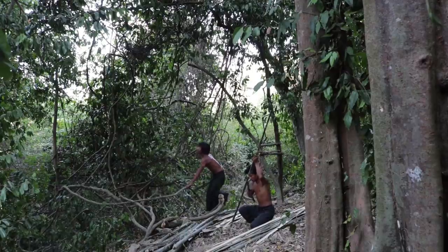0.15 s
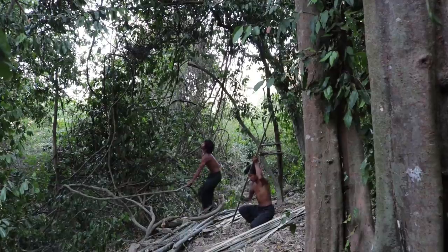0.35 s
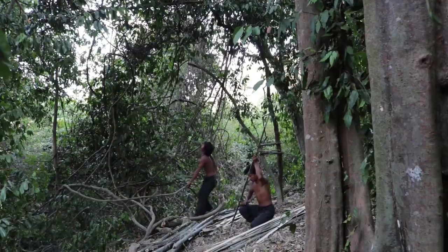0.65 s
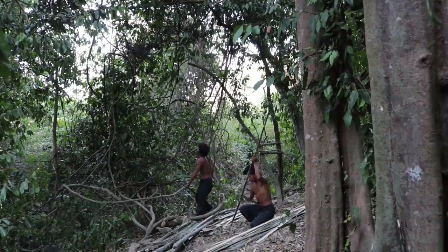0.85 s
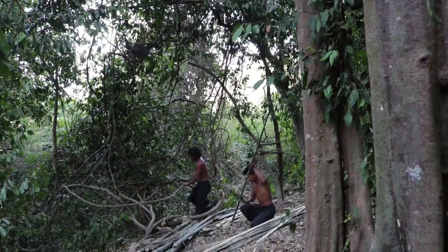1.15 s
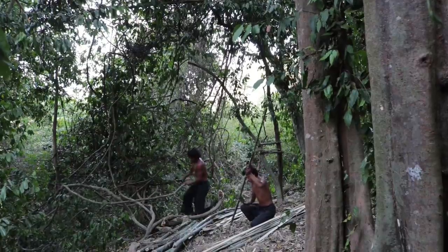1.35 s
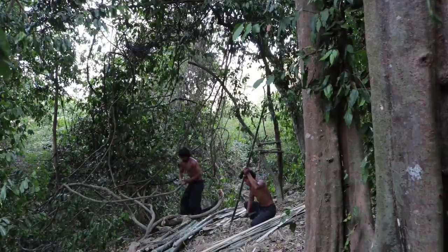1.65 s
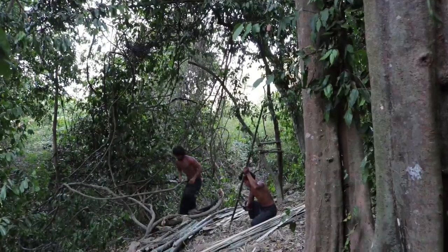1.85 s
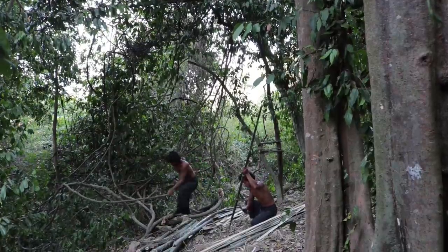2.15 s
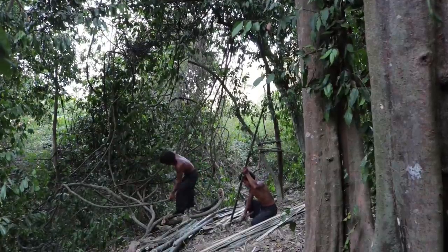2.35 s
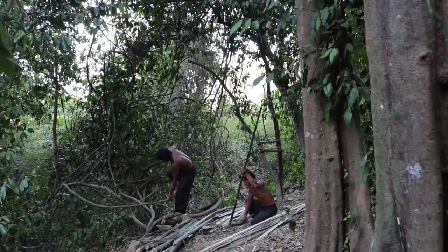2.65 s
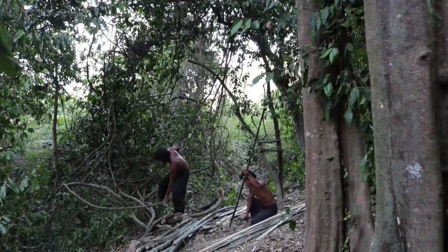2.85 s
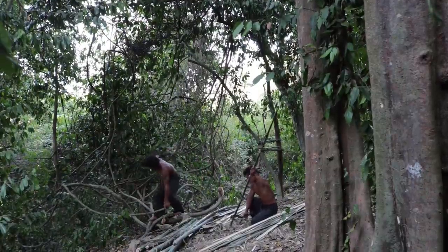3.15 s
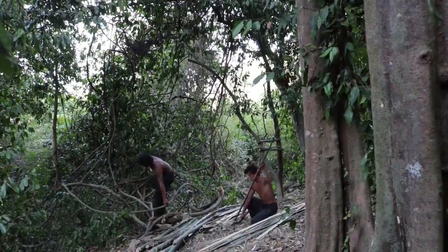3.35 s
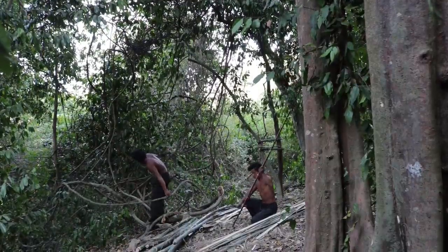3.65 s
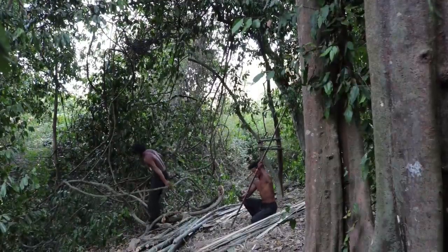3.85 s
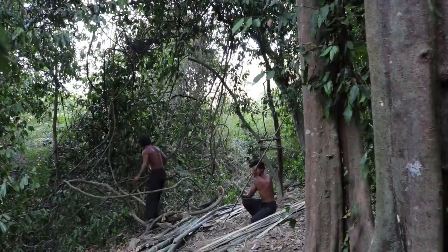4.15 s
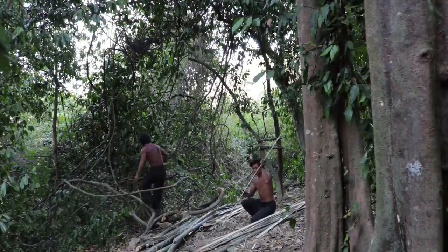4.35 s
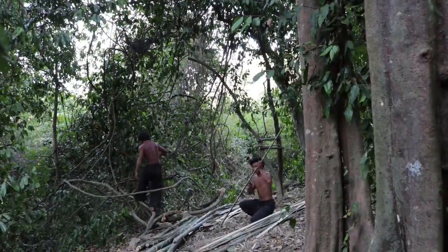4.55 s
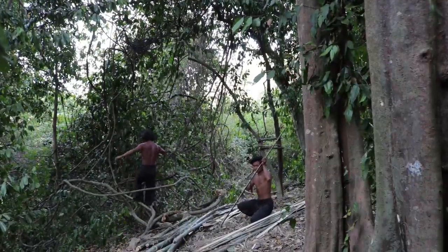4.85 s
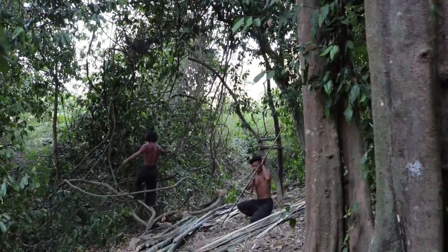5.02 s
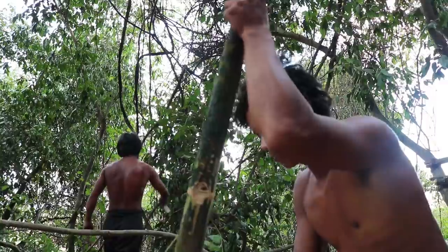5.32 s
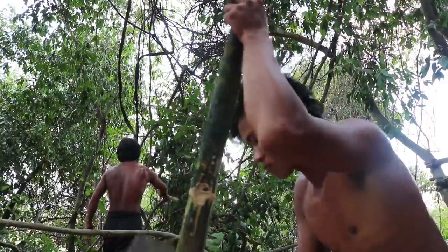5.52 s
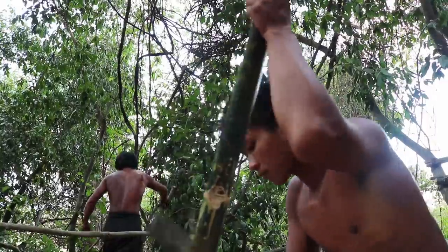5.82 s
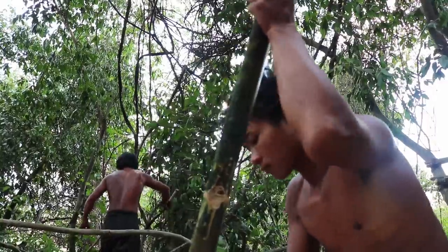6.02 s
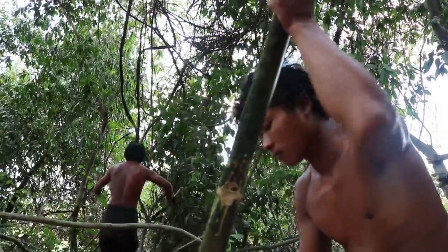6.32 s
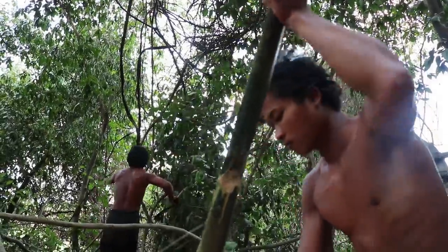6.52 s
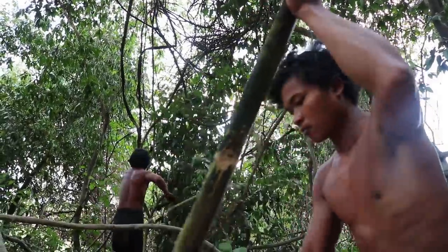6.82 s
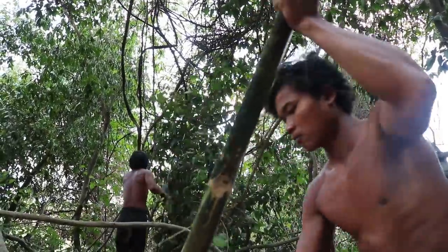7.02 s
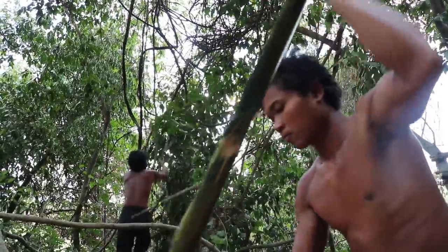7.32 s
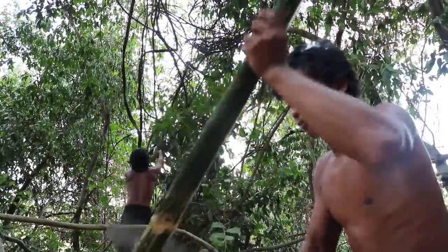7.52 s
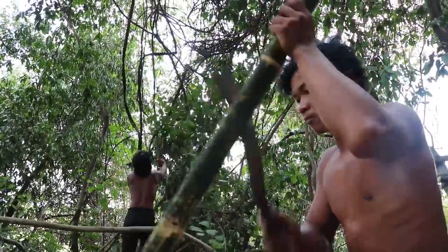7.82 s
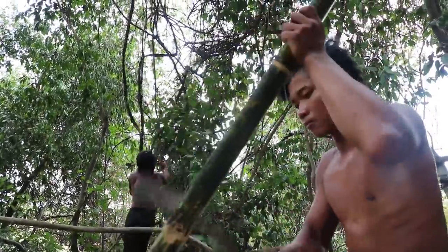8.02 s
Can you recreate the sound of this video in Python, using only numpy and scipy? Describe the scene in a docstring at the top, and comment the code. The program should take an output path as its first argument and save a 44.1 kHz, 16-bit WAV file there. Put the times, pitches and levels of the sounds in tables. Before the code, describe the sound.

In a quiet forest, distant twigs snap over rustling dry leaves and faint soft footfalls, with one sharper snap midway. The perspective suddenly jumps close: a blade cracks and rasps rapidly along a hollow bamboo pole, with bright steely bite, woody knocks and crackling brush. Strokes then thin out to faint scrapes before a last hard chop. Slightly hissy microphone, hardest hits distorted.

```python
"""Twigs snap and dry leaves rustle underfoot as green bamboo poles are trimmed far off in a forest.
Then the work is heard from close by: strokes rasp along a pole, blows chop into it.
Snaps and blows are noise bursts through resonances of wood, skin, steel and hollow pole; rasps and
rustles are patchy noise with small damped grains. One microphone feeds two slightly hissing
channels, and the hardest blows clip."""
import sys
import numpy as np
from scipy import signal
from scipy.fft import rfft, irfft, next_fast_len
from scipy.io import wavfile
from scipy.ndimage import uniform_filter1d, map_coordinates

SR = 44100
rng = np.random.default_rng(int(sys.argv[2]) if len(sys.argv) > 2 else 0)


def store_pcm(level_fs):
    """Save levels as 16-bit WAV."""
    pcm = np.round(np.clip(level_fs, -1, 1) * 32767).astype(np.int16)
    wavfile.write(sys.argv[1], SR, np.atleast_2d(pcm).T)


N = 360738
T = np.arange(N) / SR
NEAR_S = 5.35  # the listener moves close to the work

# Resonances of the hollow pole wall: (centre [Hz], width [Hz], level [dB])
POLE = [(174, 125, -4.5), (285, 67, 2.5), (514, 290, -1.5), (708, 106, 2), (920, 180, -3)]
# Resonances of the hard outer skin: (centre [Hz], width [Hz], level [dB])
SKIN = [(1120, 530, -6.5), (1850, 530, -5.5), (2590, 530, -1), (3680, 650, -3), (4930, 560, -5)]
# Resonances of the steel blade: (centre [Hz], width [Hz], level [dB])
EDGE = [(5790, 1420, -6.5), (10070, 1600, -7.5), (11000, 2100, -9.5)]


def strokes():
    """Frictional excitation: one rubbing contact drives skin, steel and hollow; fibres tear in grains."""
    # Blade and hands rubbing the pole: (full contact from [s], length [s], level at the end [dB],
    # growth along the stroke [dB], hollow relative to rasp [dB])
    stroke_rows = [(5.365, 0.07, -19, 6.5, -6), (5.588, 0.0073, -30, -8, -3.5),
                   (5.647, 0.092, -17.5, 9.5, -12.5), (5.753, 0.014, -38, -3, 5),
                   (5.8, 0.005, -33.5, 4, 4.5), (5.853, 0.061, -30, -6.5, -14), (5.95, 0.058, -18, 2.5, -5),
                   (6.076, 0.013, -41.5, -7, -15), (6.104, 0.068, -30.5, -3, -11.5),
                   (6.217, 0.066, -19.5, 3, -8.5), (6.364, 0.0062, -32.5, 1, -11),
                   (6.396, 0.15, -41, -11, -7), (6.51, 0.033, -13, 20, -12.5), (6.969, 0.02, -44, -3, -9),
                   (7.101, 0.065, -48.5, -4, -0.5), (7.201, 0.088, -54.5, -12, 0.5),
                   (7.245, 0.004, -18, -0.5, -10.5), (7.548, .13, -40.5, -10.5, -9),
                   (7.795, 0.039, -44, 5, -24), (7.952, 0.065, -16.5, 14.5, -16.5),
                   (8.105, 0.049, -47, -6, -11), (8.165, 0.031, -31, 2, -30)]
    # after lift-off both sound on faintly; the hollow drops less from its own stroke level
    shiver_db, hum_db = -22, -17
    steel_db = -9  # blade hiss beside a rasp at full scale
    brighter_when_light = 0.23  # light strokes hiss: dB of hiss gained on the rasp per dB under full scale

    rasp, hollow = np.zeros(N), np.zeros(N)
    for start, length, db, growth_db, hollow_db in stroke_rows:
        contact, trail = stroke(start, length, db, growth_db)
        rasp += contact + amp(shiver_db) * trail
        hollow += amp(hollow_db) * (contact + amp(hum_db) * trail)
    rasp, hollow = rasp * (T >= NEAR_S), hollow * (T >= NEAR_S)

    chatter = amp(2.5 * wobble(250))
    rub = unit(patchy(2) * chatter)
    fibres = grains(2890, count=9000, spread=0.44, cycles=7.2, size_db=5.5)
    skin = unit(0.74 * fibres + unit(ringing(rub, SKIN)))

    flickering_rub = rub * amp(3.0 * wobble(60))
    steel = unit(ringing(ringing(flickering_rub, EDGE), [(7960, 13000, 0)]))
    steel_level = amp(steel_db) * rasp ** (1 - brighter_when_light)

    body = unit(ringing(ringing(hollow * rub, POLE), [(370, 710, 0)]))
    body *= np.sqrt(np.mean(hollow ** 2))
    return rasp * skin + steel_level * steel + body


def stroke(start, length, db, growth_db):
    """Contact envelope: exponential build-up, even drift in dB, lift-off, then a decaying free vibration."""
    bite_db_per_s, lift_db_per_s, shiver_db_per_s = 925, 2500, 165
    after = T - start - length
    held = db + growth_db * np.clip(after / length, -1, 0)
    building = bite_db_per_s * np.maximum(start - T, 0)
    lifting = lift_db_per_s * np.maximum(after, 0)
    trail = (after > 0) * amp(db - shiver_db_per_s * np.maximum(after, 0))
    return amp(held - building - lifting), trail


def blows():
    """Impact excitation: a sharp crack rings skin and steel, a slower blunt push rings the hollow."""
    # Near blows: (time [s], peak of the crack [dB], knock relative to the crack [dB],
    # weight of the steel resonances [dB], strongest tone [Hz])
    blow_rows = [(5.352, -5, -3.5, -24, 1190), (5.417, -4, -20, -11, 3300), (5.431, -10.5, -5.5, -9, 2920),
                 (5.528, -16, 3, 2, 490), (5.569, -8.5, -6, -14, 2190), (5.731, -9.5, 1, 17, 2900),
                 (5.763, -18, 2.5, 2, 780), (5.825, -9, -6, 5, 2730), (5.994, 1.5, -20.5, 20, 4770),
                 (6.104, -13, -6.5, -12, 2670), (6.254, 0.5, -11.5, 7, 3940), (6.402, -6.5, -17, -18, 2520),
                 (6.514, 0, -10, 8.5, 460), (6.538, -7, -5, -5, 2350), (6.594, -23, -14, 6, 2280),
                 (6.799, -26, -8, 11, 1850), (7.098, -23.5, -13, 12.5, 940), (7.246, -10, -8, 1.5, 790),
                 (7.375, -26, -35, 4, 2030), (7.74, -22.5, -36, -14, 1670), (7.891, -7.5, -7, -31, 1650),
                 (7.904, -7.5, -10.5, -18, 1600), (8.012, 1, -17.5, -1.5, 5940)]
    # Soft bumps that sound the hollow: (time [s], peak level [dB])
    bump_rows = [(5.536, -23), (5.574, -18), (5.678, -14), (5.77, -27), (5.843, -27.5), (5.885, -22.5),
                 (5.964, -15.5), (6.222, -18), (7.553, -37), (8.105, -29)]

    out, t = np.zeros(N + SR), np.arange(4096) / SR
    knock = ringing(blunt_push(t, 0.0003), POLE)
    knock /= abs(knock).max()
    for s, db, knock_db, steel_db, hz in blow_rows:
        steel = [(c, w, g + steel_db) for c, w, g in EDGE]
        skin = crack(SKIN + steel, hz, t60=0.027, rise_s=0.0003, tick_db=14, tone_db=9)
        out[round(s * SR):][:len(t)] += amp(db) * (skin + amp(knock_db) * knock)

    # a soft, longer contact leaves mostly the main note of the hollow
    bump = ringing(ringing(blunt_push(t, 0.0014), POLE), POLE[1:2])
    bump /= abs(bump).max()
    for s, db in bump_rows:
        out[round(s * SR):][:len(t)] += amp(db) * bump
    return out[:N]


def blunt_push(t, peak_s):
    """Contact force pulse: a longer push, greatest at peak_s, carries less treble."""
    return t * t * np.exp(-2 * t / peak_s)


def far_work():
    """Impulsive snaps with diffuse scattering from the trunks, over leaf noise from many small contacts."""
    # Snaps and chops: (time [s], peak level [dB], strongest tone [Hz], weight of the low modes [dB])
    snap_rows = [(0.2353, -25.5, 3550, -10), (0.267, -38, 1290, -12), (.36, -21.5, 1720, -3),
                 (.687, -28, 1860, -3), (1.104, -40, 2130, -12), (1.599, -36, 1400, -12),
                 (1.674, -31, 2100, -7), (2.081, -23, 683, 6.5), (2.285, -41, 1600, -12),
                 (2.313, -45, 1700, -12), (2.327, -37, 1320, -12), (2.384, -13.5, 2380, 4),
                 (2.499, -39, 2460, 6), (2.527, -37, 2250, -14), (2.683, -25, 2020, 1), (2.7, -34, 2070, 1),
                 (2.984, -30.5, 2000, -2.5), (3.007, -28, 4600, 1), (3.343, -33.5, 4400, -0.5),
                 (4.887, -30.5, 4760, -4.5), (5.189, -22, 4700, -4)]
    # Resonances of the wood: (centre [Hz], width [Hz], level [dB])
    twig = [(278, 960, 0), (810, 1560, 5), (1360, 850, 0.5), (2140, 130, 3), (3130, 170, -0.5),
            (5100, 1500, -2.5), (12000, 9300, -9)]
    snaps = np.zeros(N)
    for s, db, hz, low_db in snap_rows:
        wood = [(c, w, g + low_db * (c < 1000)) for c, w, g in twig]
        sound = crack(wood, hz, t60=0.024, rise_s=0.00081, tick_db=-7, tone_db=7.0)
        snaps[round(s * SR):][:4096] += amp(db) * sound

    t = np.arange(SR // 3) / SR
    scatter = amp(-60 * t / 0.079) * rng.standard_normal(len(t))
    haze = signal.fftconvolve(snaps, scatter / np.linalg.norm(scatter))[:N]
    litter, swish = leaves()
    return snaps + amp(-11.5) * haze + litter + swish


def leaves():
    """Granular friction: patchy noise and tiny damped grains, as a steady stir and as separate swells."""
    # Level of the steady stir: (time [s], level [dB])
    litter_levels = [(0, -63), (.5, -64), (.6, -55), (1.3, -58.5), (1.5, -65.5), (1.9, -59.5), (2.6, -60.5),
                     (3.1, -67), (5.35, -67)]
    # Leaves kicked or brushed: (loudest moment [s], level [dB])
    swell_rows = [(0.005, -43), (0.247, -48), (0.369, -41.5), (.62, -62), (0.689, -42), (1.002, -42),
                  (1.05, -52), (1.691, -43.5), (1.759, -46.5), (1.9, -56.5), (2.083, -40.5), (2.398, -36.5),
                  (2.56, -56), (2.688, -43.5), (3.002, -45), (3.351, -49), (3.75, -54.5), (4.15, -58),
                  (4.82, -61), (4.901, -52.5), (5.194, -40)]
    # Spectrum of the stirred litter: (frequency [Hz], density [dB per Hz])
    litter_spectrum = [(590, -37), (1000, -11), (1630, -9), (2150, -4), (2680, -13.5), (4730, -6),
                       (7880, -13.5), (14800, -16), (16000, -28)]
    # Spectrum of brushed leaves: (frequency [Hz], density [dB per Hz])
    swish_spectrum = [(350, -9), (600, -16), (894, -15.5), (1260, -16), (2180, -2.5), (2830, -7.5),
                      (4840, 2), (12300, -9.5), (16000, -17)]
    # Thin whistle that comes and goes in the stir: (centre [Hz], width [Hz], level [dB])
    whistle_mode = [(2135, 88, 0)]
    swell_db_per_s, settle_db_per_s = 317, 243

    swell = np.zeros(N)
    for s, db in swell_rows:
        fall_db = np.where(T < s, swell_db_per_s * (s - T), settle_db_per_s * (T - s))
        swell += amp(db - fall_db)

    crumbs = grains(2400, count=3000, spread=0.48, cycles=2.6, size_db=5.5)
    flicker = amp(3.5 * wobble(20))
    tone = ringing(ringing(rng.standard_normal(N), whistle_mode), whistle_mode)
    whistle = amp(-12.5) * unit(flicker * tone)
    stir = unit(coloured(patchy(2.1), litter_spectrum) + 0.51 * crumbs + whistle)
    litter = amp(played(litter_levels)[0]) * stir

    brushed = unit(coloured(patchy(1.5), swish_spectrum) + .15 * crumbs)
    return litter, swell * amp(1.5 * wobble(90)) * brushed


def footfalls():
    """Damped oscillation: soft ground gives a low, quickly decaying thump."""
    # Soft footfalls: (time [s], level before rise and decay [dB], pitch [Hz])
    thuds = [(0.619, -50, 51.1), (2.1, -54, 189), (2.398, -45, 200), (2.698, -49.5, 157),
             (3.017, -46, 99.6), (3.238, -37.5, 55), (3.728, -37, 51), (4.63, -44, 72), (5.196, -39.5, 84)]
    out, t = np.zeros(N), np.arange(SR // 4) / SR
    rise = 1 - np.exp(-t / 0.0013)
    for s, db, hz in thuds:
        out[round(s * SR):][:len(t)] += amp(db - 60 * t / 0.17) * rise * np.sin(2 * np.pi * hz * t)
    return out


def pips():
    """Tone bursts: short sines under a smooth bell, perhaps a distant bird."""
    # Faint soft pips: (time [s], peak level [dB], pitch [Hz])
    pip_rows = [(6.605, -43, 994), (6.625, -52, 996), (6.775, -42.5, 1050), (6.852, -43, 990),
                (6.8925, -44, 980), (6.922, -50, 960), (6.9451, -52, 940), (8.107, -34, 2270),
                (8.128, -39, 2290), (8.143, -39, 2330)]
    out, t = np.zeros(N), np.arange(round(0.027 * SR)) / SR
    for s, db, hz in pip_rows:
        out[round(s * SR):][:len(t)] += amp(db) * np.hanning(len(t)) * np.sin(2 * np.pi * hz * t)
    return out


def forest():
    """Broadband ambience: still air throughout; close by, crackling brush and ground-borne pole rumble."""
    # Levels close by: (time [s], brush [dB], rumble [dB])
    nearby = [(5.35, -41.5, -41.5), (5.8, -50, -43.5), (6.05, -41.5, -46), (6.47, -39, -39),
              (6.58, -48.5, -45), (6.8, -43, -47), (7.05, -49, -43.5), (7.45, -45, -43.5), (7.8, -41, -53),
              (8.18, -41, -40.5)]
    # Spectrum of the still forest: (frequency [Hz], density [dB per Hz])
    air_spectrum = [(15, -15), (40, -2), (76, -6), (127, -8), (293, -15), (641, -16), (800, -17),
                    (1290, -21), (5850, -30.5), (16000, -32)]
    # Spectrum of the brush: (frequency [Hz], density [dB per Hz])
    brush_spectrum = [(88, 2), (150, 3), (354, -2.5), (662, -7.5), (1690, -5), (5360, -9), (11300, -13),
                      (16000, -22)]
    # Spectrum of the rumble: (frequency [Hz], density [dB per Hz])
    rumble_spectrum = [(12, -45), (20, 2.5), (59, -7), (92, 4.5), (107, 3), (145, -19), (300, -19),
                       (390, -10), (660, -120)]

    brush_db, rumble_db = played(nearby)
    air = amp(-59.5 + 0.93 * wobble(4.06)) * coloured(rng.standard_normal(N), air_spectrum)
    twigs = grains(5200, count=2500, spread=0.99, cycles=1.4, size_db=9.0)
    crackle = unit(coloured(patchy(1.5), brush_spectrum) + .35 * twigs)
    brush = amp(brush_db + 1.5 * wobble(30)) * crackle
    rumble = amp(rumble_db + 2 * wobble(12)) * coloured(rng.standard_normal(N), rumble_spectrum)
    return air + brush + rumble


def crack(modes, hz, t60, rise_s, tick_db, tone_db):
    """Modal response: a sharp tick and a dying crackle excite a body, one mode most; peak 1."""
    t = np.arange(4096) / SR
    burst = amp(-60 * t / t60) * (1 - np.exp(-t / rise_s)) * rng.standard_normal(len(t))
    burst[0] -= amp(tick_db)
    varied = [(c, w, g + rng.normal(0, 3)) for c, w, g in modes]  # each crack differs in timbre
    sound = ringing(burst, varied) + ringing(burst, [(hz, 0.17 * hz, tone_db)])
    return sound / abs(sound).max()


def grains(centre_hz, count, spread, cycles, size_db):
    """Granular emission: damped tones at random moments, log-normal in pitch and size; rms 1."""
    chance, t = rng.standard_normal((count, 2)), np.arange(128) / SR
    at = rng.integers(0, N, count)
    hz = np.clip(centre_hz * np.exp(spread * chance[:, :1]), 300, 15000)
    sizes = amp(size_db * chance[:, 1:])
    tones = sizes * np.exp(-t * hz / cycles) * np.sin(2 * np.pi * hz * t)
    places = at[:, None] + np.arange(len(t))
    return unit(np.bincount(places.ravel(), tones.ravel(), minlength=N)[:N])


def patchy(depth_db):
    """Non-stationary noise: its colour drifts in random patches of time and frequency; rms 1."""
    z = signal.stft(rng.standard_normal(N), nperseg=256)[2]
    field = uniform_filter1d(rng.standard_normal(z.shape), size=5, axis=0)
    field = uniform_filter1d(field, size=8, axis=1)
    return unit(signal.istft(z * amp(depth_db * unit(field)), nperseg=256)[1][:N])


def ringing(x, modes):
    """Modal superposition: x through band-pass resonances of alternating sign."""
    def response(f):
        total = 0
        for k, (c, w, db) in enumerate(modes):
            total = total + (-1) ** k * amp(db) * 1j * f * w / (c * c - f * f + 1j * f * w)
        return total
    return filtered(x, response)


def coloured(x, spectrum):
    """Spectral shaping: x follows (Hz, dB) points joined on a log-frequency axis; rms 1."""
    f, db = np.transpose(spectrum)
    return unit(filtered(x, lambda hz: amp(np.interp(np.log(hz + 1), np.log(f), db))))


def filtered(x, response):
    """Linear filtering: the spectrum of x times a complex response of frequency."""
    m = next_fast_len(x.shape[-1] + 8192)  # padding keeps tails from wrapping round
    return irfft(rfft(x, m) * response(np.fft.rfftfreq(m, 1 / SR)), m)[..., :x.shape[-1]]


def played(rows):
    """Level automation: one dB value per sample for each column, silence outside the table."""
    s, *cols = np.transpose(rows)
    return [np.interp(T, s, c, left=-150, right=-150) for c in cols]


def wobble(rate):
    """Slow random modulation: a smooth curve through rate random knots a second."""
    return map_coordinates(rng.standard_normal(int(N * rate / SR) + 4), [T * rate])


def amp(db):
    """Decibel law: the amplitude gain of a level in dB."""
    return 10 ** (np.asarray(db) / 20)


def unit(x):
    """Power normalisation: x at rms 1."""
    return x / np.sqrt(np.mean(x ** 2) + 1e-20)


def scene():
    """Superposition: the pressures of all sources add at one microphone, the same in both channels."""
    far = (far_work() + footfalls()) * (T < NEAR_S)
    return np.tile(far + strokes() + blows() + pips() + forest(), (2, 1))


def record(dry):
    """Saturation and noise: peaks clip, each channel adds its own hiss, the band ends steeply."""
    # Spectrum of the amplifier noise: (frequency [Hz], density [dB per Hz])
    hiss_spectrum = [(15, -31), (25, -14), (49, -4), (223, -7), (309, -10), (14400, -20), (16000, -12.5)]
    hiss_db, top_hz = -65, 15900
    clipped = dry / (1 + abs(dry / 1.02) ** 8) ** (1 / 8)
    hiss = np.array([coloured(rng.standard_normal(N), hiss_spectrum) for _ in clipped])
    return filtered(clipped + amp(hiss_db) * hiss, lambda hz: hz < top_hz)


dry = scene()
out = record(dry)
store_pcm(out)
```